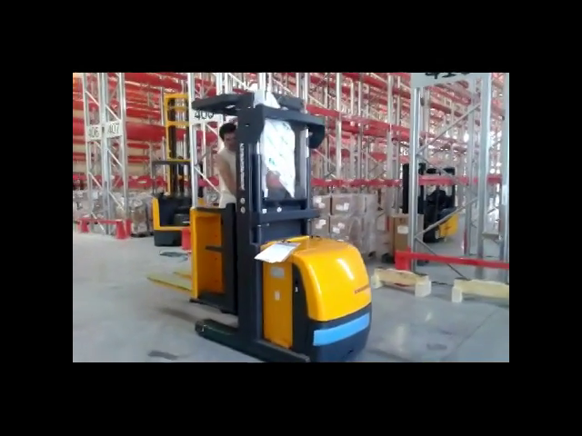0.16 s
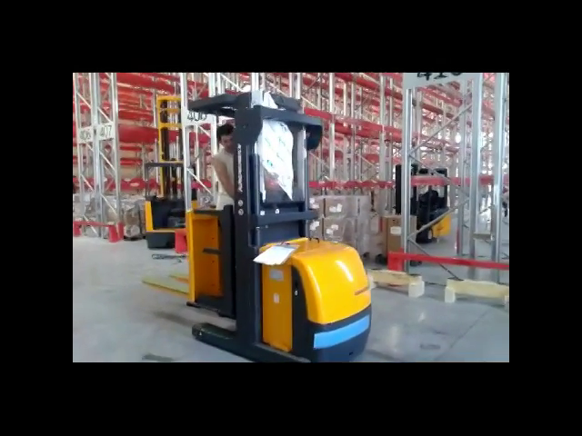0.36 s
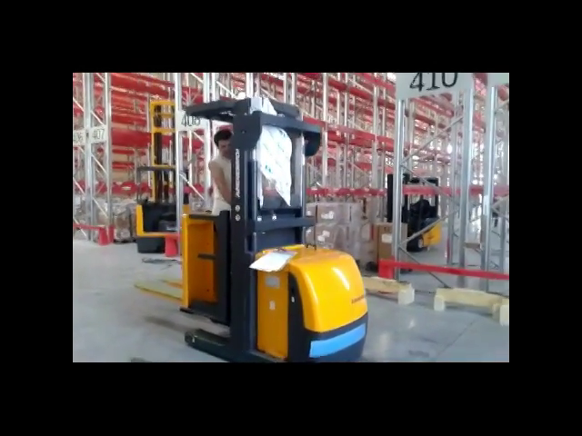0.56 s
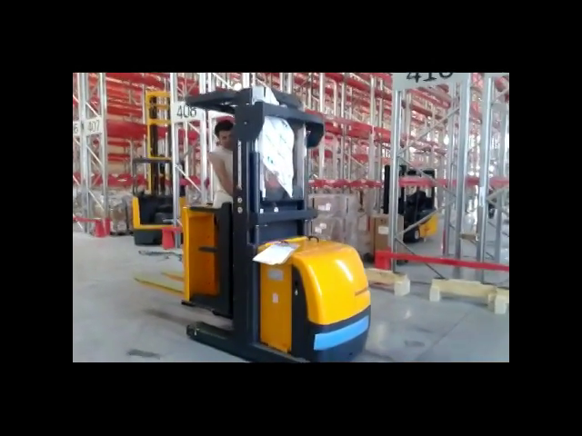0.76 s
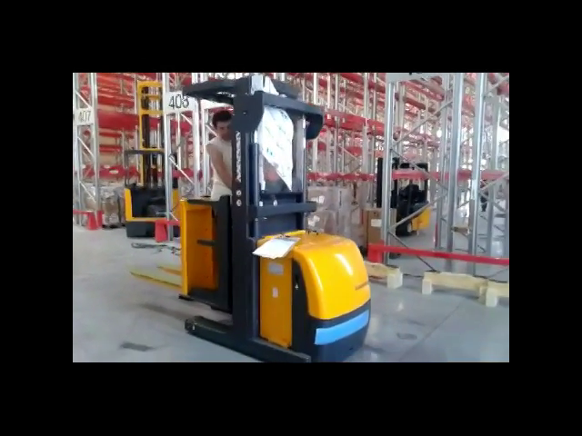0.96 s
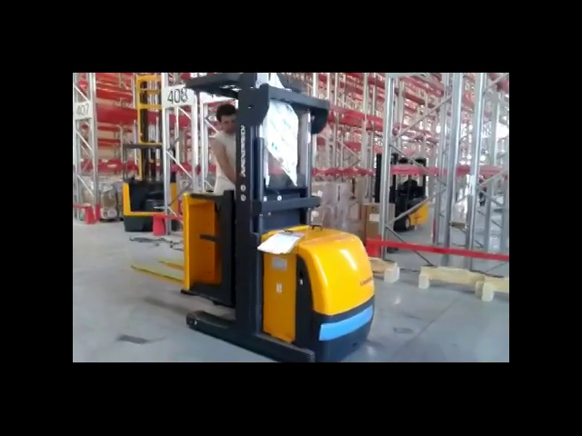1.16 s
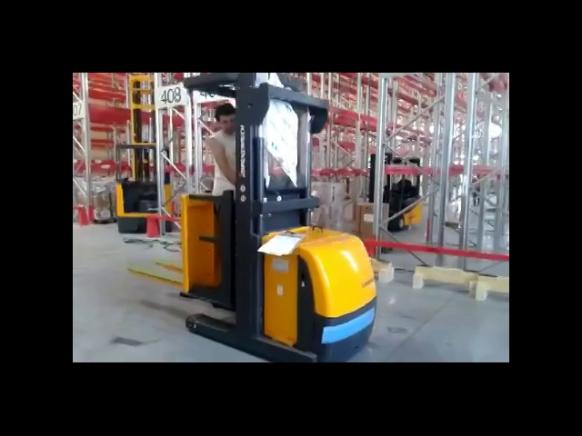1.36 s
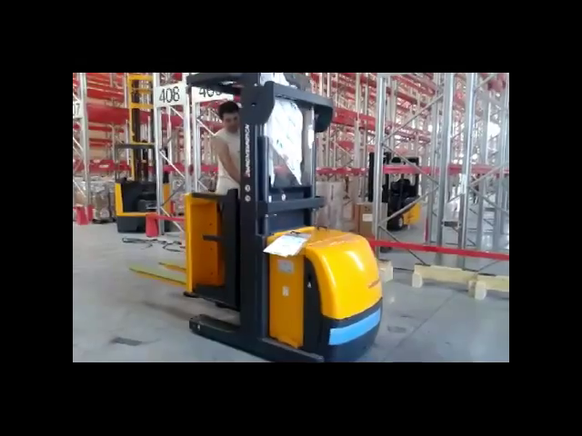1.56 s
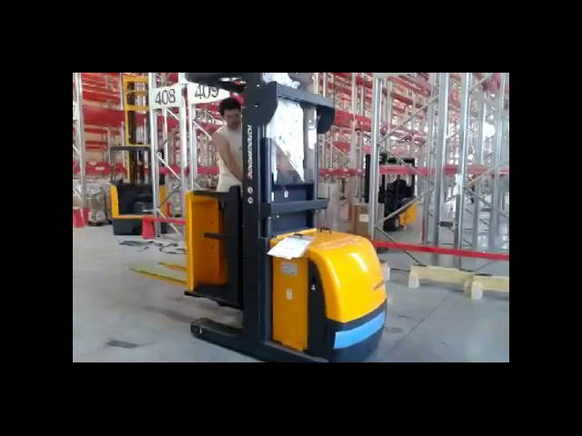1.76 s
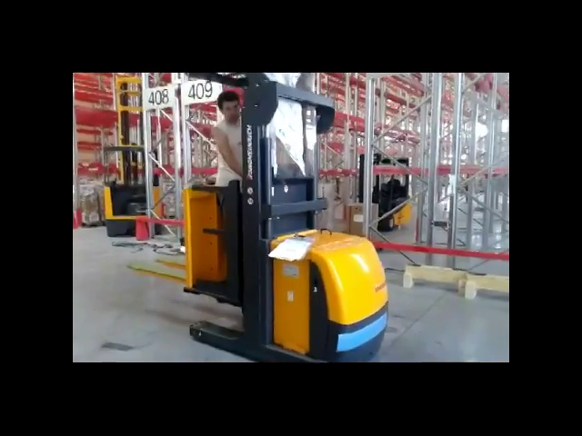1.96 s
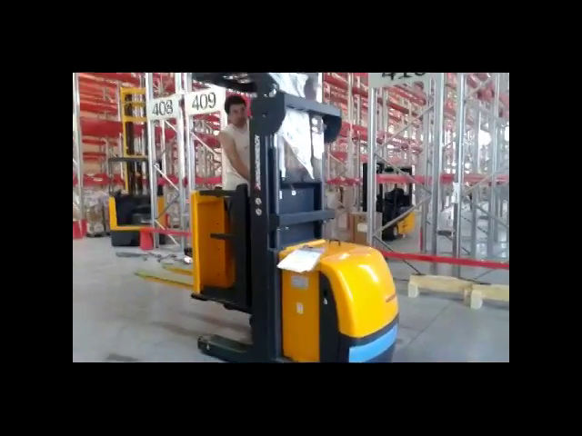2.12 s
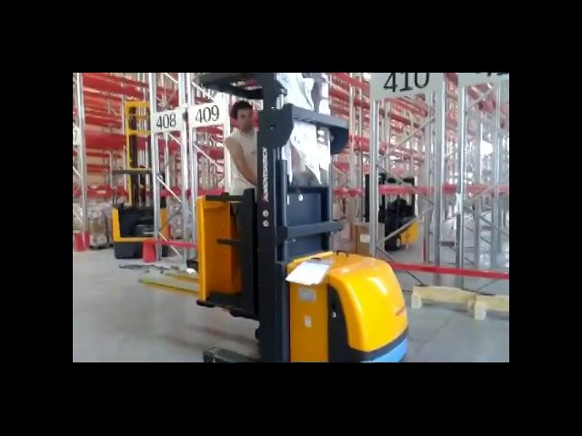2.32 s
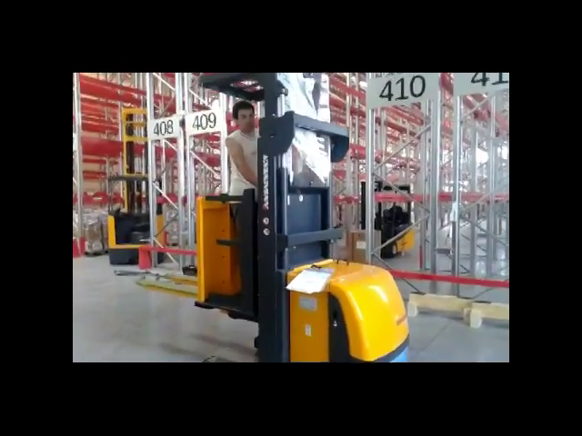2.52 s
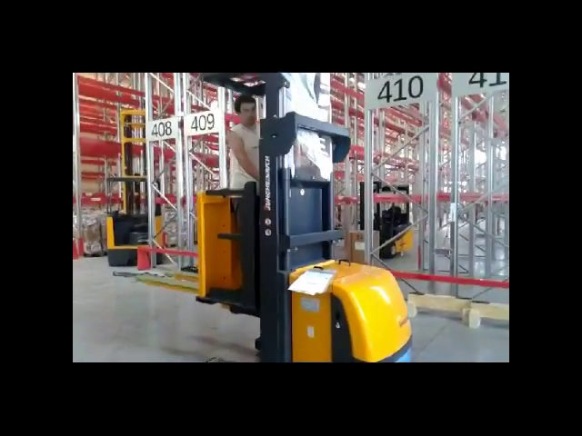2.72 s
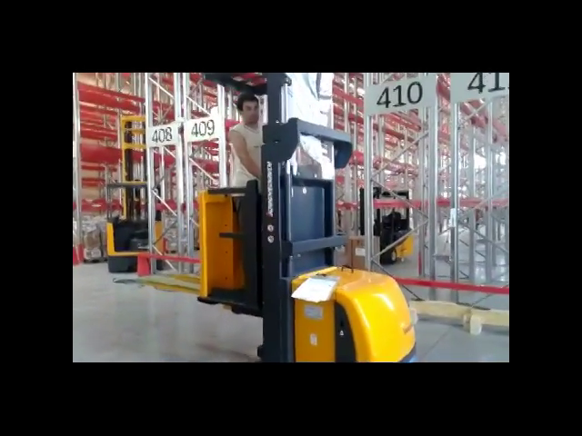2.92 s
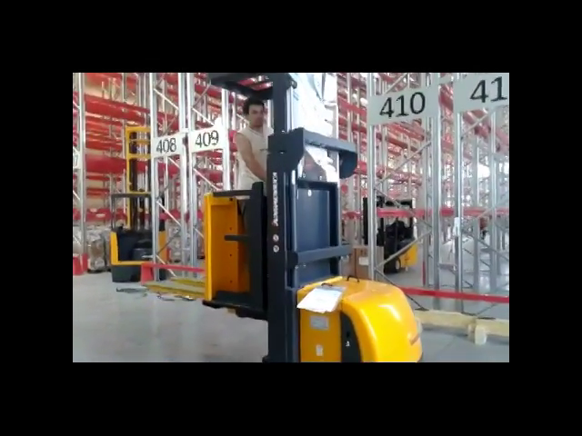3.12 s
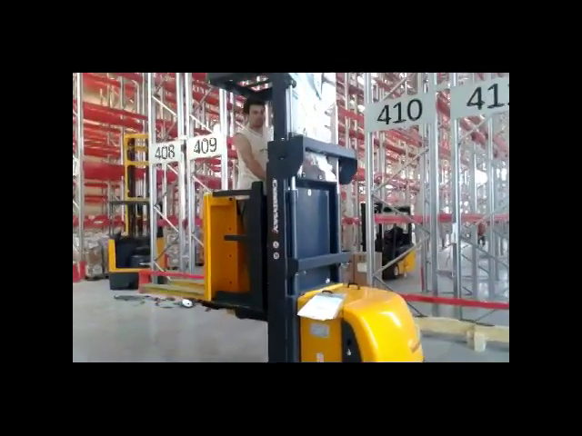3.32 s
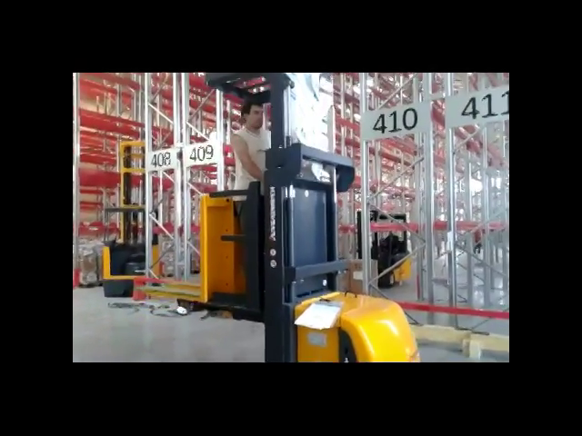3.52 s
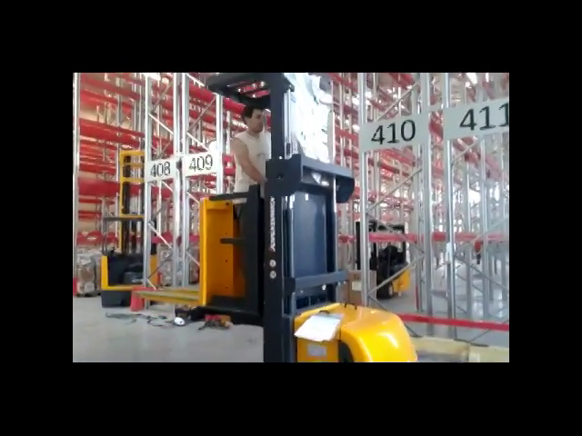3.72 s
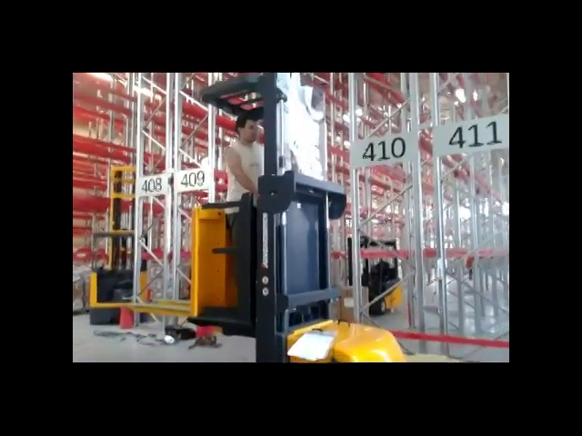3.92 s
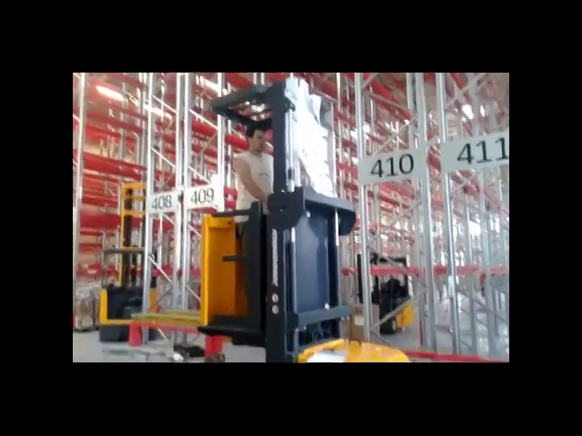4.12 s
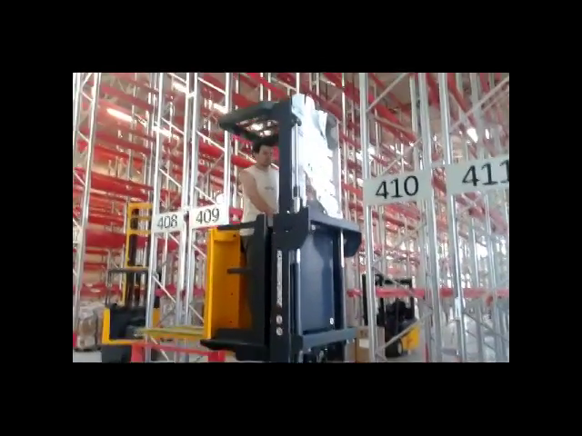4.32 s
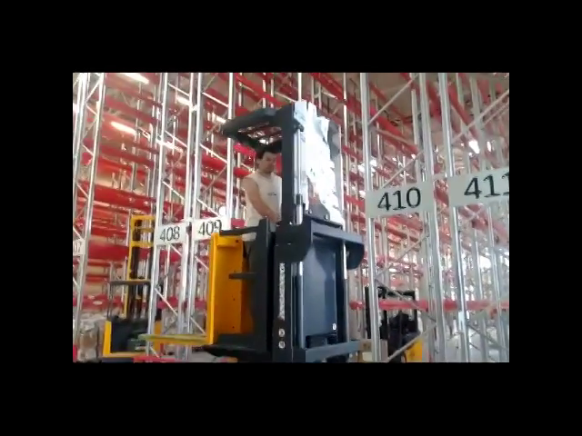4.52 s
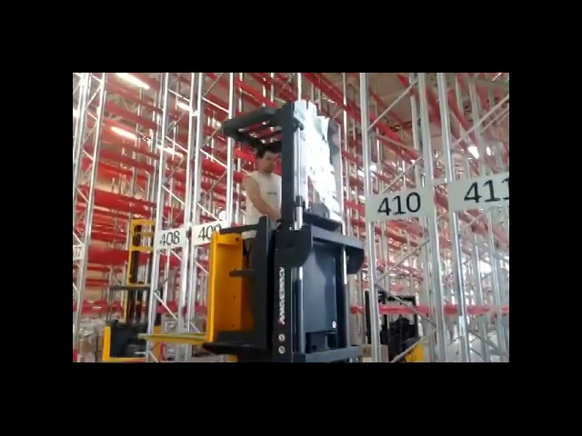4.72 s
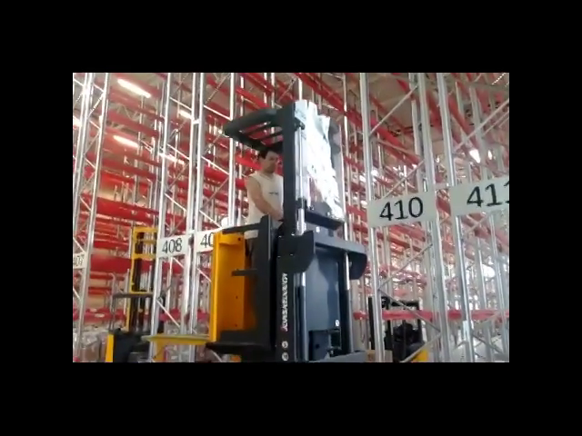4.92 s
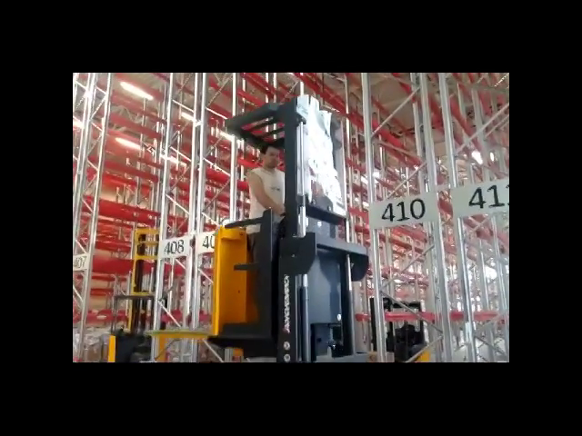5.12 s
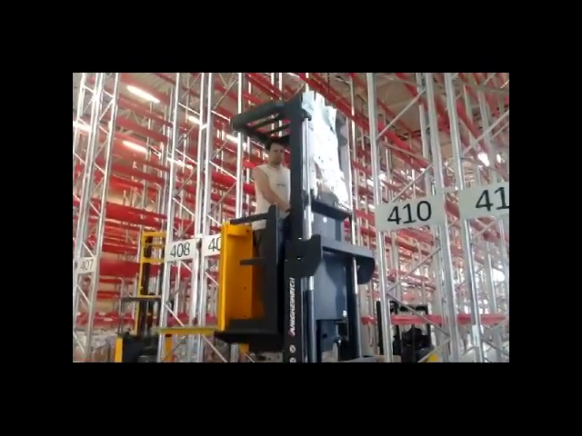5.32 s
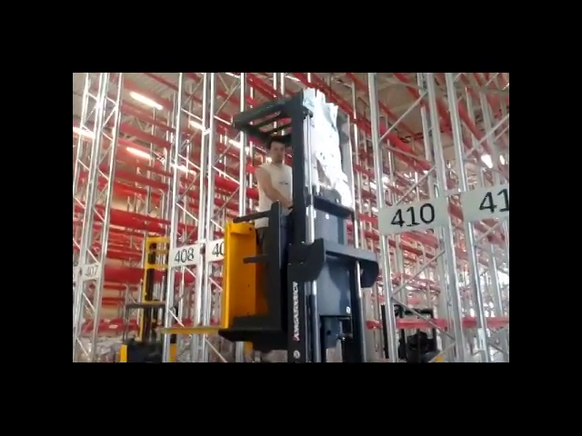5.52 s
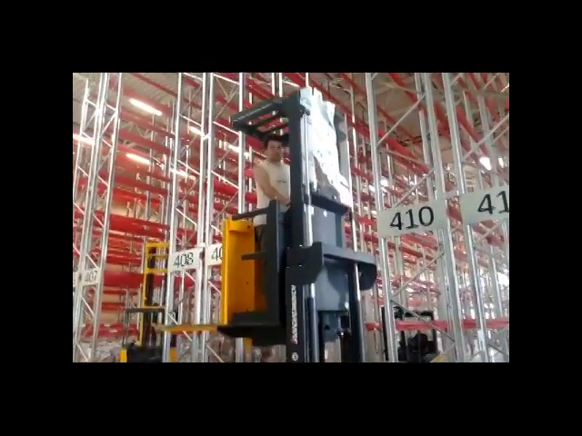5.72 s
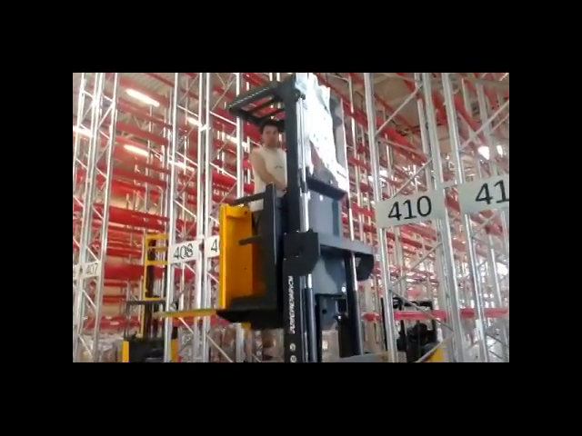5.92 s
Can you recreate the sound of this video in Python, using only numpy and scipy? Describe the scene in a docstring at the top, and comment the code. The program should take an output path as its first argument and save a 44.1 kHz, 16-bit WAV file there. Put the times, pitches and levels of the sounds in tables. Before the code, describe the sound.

A big hard-walled warehouse begins nearly quiet: a low, soft wash of distant work, faint electrical tones and a barely audible onset. From about 0.35 to 0.85 s something rustles close to the microphone in short bright strokes, while a far motor glides upward around 0.8 s. Dull, woody knocks land near 1.1 s, with a softer one at 1.24 s. At about 1.45 s the lift motor starts, groaning and sweeping upward, with a brief cover boom near 1.7 s, slightly overshooting about 2.05 s. It settles into a loud, steady hum, layered gear whine and bright oil hiss, throbbing around five times a second. Thin high whistles flutter from about 2.5 s, then fade. At 4.57 s a sharp, rattling steel clank rings through the hall. Around 5.8 s the hiss swells and the pitch sags, then partly recovers as two lighter clanks sound near 6 s, the motor still running.

```python
"""After a faint soft onset, a close rustle and dull knocks, an electric order picker raises its platform.
A distant motor glides upward in the warehouse; then the picker's motor spins up and drives its gear pump.
Twelve teeth give a hum and shaft multiples a whine, while turbulent oil rushes and hisses as filtered noise.
The load bounces on the oil column and rocks the speed; struck mast modes clank and the cover booms.
Near the end the motor sags, the hiss swells and the last clanks ring, over a steady wash of noise and faint tones."""
import sys
import numpy as np
from scipy import signal
from scipy.fft import rfft, irfft
from scipy.io import wavfile
from scipy.ndimage import uniform_filter1d

SR = 44100
rng = np.random.default_rng(int(sys.argv[2]) if len(sys.argv) > 2 else 0)


def transcribe(signal):
    """Save signal, clipped to [-1, 1], as a 16-bit WAV file at the path in sys.argv[1]."""
    frames = np.atleast_2d(signal).T
    limited = np.clip(frames, -1, 1)
    pcm = np.round(limited * 32767).astype(np.int16)
    wavfile.write(sys.argv[1], SR, pcm)


N = 267687
T = np.arange(N) / SR  # s
HZ = np.maximum(np.arange(N + 1) * SR / (2 * N), 1)  # frequency axis of the filters
TEETH = 12
FULL_SPEED = 37.8  # turns per s

# the pump takes up its load: moment of half level and time constant
WHINE_ON_S, WHINE_ATTACK_S = 1.526, 0.023
HISS_ON_S, HISS_ATTACK_S = 1.57, 0.026
WHINE_DB, HISS_DB = -32, -29.5  # drive levels that the whine and oil layers are scaled from
# extra effort while the platform gets moving
STRAIN_S, STRAIN_LENGTH_S, STRAIN_DB = 1.89, 0.12, 1.5
# the oil hisses harder in the last sag
SAG_S, SAG_LENGTH_S, SAG_HISS_DB = 5.8, 0.21, 2.5
# the gear overtones stand out while the motor accelerates
GRIND_S, GRIND_LENGTH_S, GRIND_DB = 1.44, 0.5, 3.5
BOUNCE_SWING_HZ = .65  # quickening of the shaft at the top of a bounce
JUDDER_TURNS = .0004  # spread of the shaft angle when well below full speed
# narrow resonances that whistle when a shaft multiple meets them
HIGH_WHISTLE_HZ, LOW_WHISTLE_HZ = 7259, 2035
# nominal speed of the pump shaft: spin-up, overshoot and two sags [time_s, speed_turns_per_s]
SHAFT_SPEED = [(1.4, 0), (1.55, 13), (1.62, 17.8), (1.7, 25.3), (1.79, 30.5), (1.88, 33), (1.96, 35.6),
               (2.05, 38), (2.13, 36.55), (2.27, 36.8), (2.33, 37.7), (2.38, 37.35), (2.5, 37.4),
               (2.65, 37.6), (5.62, 37.62), (5.77, 37.7), (5.855, 37.2), (5.9, 35.6), (5.945, 34.8),
               (6.04, 35.8), (6.07, 35.8)]
# level of each whistling resonance [time_s, level_db]
HIGH_WHISTLE_LEVEL = [(2.45, -50), (2.62, -32), (2.88, -33), (3.0, -33.5), (3.9, -38), (4.4, -47),
                      (5.7, -45), (5.85, -63)]
LOW_WHISTLE_LEVEL = [(4.55, -53), (4.949, -48), (5.4, -43), (5.7, -45), (5.8, -66)]


def lift():
    """Phase coupling: the integral of one shaft speed drives hum, whine and oil noise together."""
    speed = uniform_filter1d(curve(SHAFT_SPEED), SR // 25) + BOUNCE_SWING_HZ * surge()
    speed = speed * (1 + 0.0004 * walk(30))
    pace = speed / FULL_SPEED
    turns = np.cumsum(speed) / SR
    judder = JUDDER_TURNS * gliding_share(speed) * walk(70)

    strain_db = STRAIN_DB * swell(STRAIN_S, STRAIN_LENGTH_S)
    sag_db = SAG_HISS_DB * swell(SAG_S, SAG_LENGTH_S)
    grind_db = GRIND_DB * swell(GRIND_S, GRIND_LENGTH_S)
    whine = rise(WHINE_ON_S, WHINE_ATTACK_S) * undb(WHINE_DB + strain_db + 0.61 * walk(14))
    hiss = rise(HISS_ON_S, HISS_ATTACK_S) * undb(HISS_DB + strain_db + sag_db + 0.83 * walk(12))

    hum = pump_hum(turns, speed, running=np.minimum(whine / whine.mean(), 1)) * undb(-0.68)
    lines = pump_whine(turns + judder, speed, whine * undb(31.5 + grind_db), hiss * undb(30.5))
    whistles = hall(singing(turns), wet_db=1, t60=0.21)
    whistles = whistles + whistle(turns, HIGH_WHISTLE_HZ, HIGH_WHISTLE_LEVEL)
    whistles = whistles + whistle(turns, LOW_WHISTLE_HZ, LOW_WHISTLE_LEVEL)

    body = oil(turns, HOUSING_RESPONSE, pulsing=0.16, repeat_db=-14) * whine * undb(-7.0)
    # plain hiss gives way to the pitched squeal as the pump comes up to speed
    pitched = .35 * np.minimum(pace, 1) ** 3
    plain = oil(turns, HISS_RESPONSE, pulsing=0.15, repeat_db=-41)
    hissing = plain * np.sqrt(1 - pitched) + squeal(turns) * np.sqrt(pitched)
    hissing = hissing * hiss * undb(-4.5 - 1.28 * pace ** 4)
    flow = hall(body + hissing, wet_db=-7, t60=0.87)
    return hum + booms() + whistles + hall(lines, wet_db=-0.5, t60=0.68) + flow


THROB_LEAD_S = 0.061  # the sound throbs with the bounce, ahead of the speed
HUM_THROB_DB = 2.5  # times a share from -0.5 to 0.5 set by the speed
# share of the panels in the hum, at steady speed and added far below it
GROAN_STEADY_DB, GROAN_GLIDING_DB = -27, -8.5
# relative level of the tooth-rate hum [time_s, level_db]
HUM_LEVEL = [(1.45, -78), (1.49, -46), (1.64, -34), (1.68, -23), (1.76, -22.5), (1.85, -28.5), (1.9, -28),
             (1.94, -19.5), (2.02, -30), (2.12, -19), (2.17, -35), (2.21, -20.5), (2.27, -35.5),
             (2.34, -22.5), (2.42, -20), (2.98, -28.5), (3.04, -25.5), (3.41, -29), (3.44, -25),
             (4.36, -31.5), (4.47, -27.5), (5.12, -26.5), (5.935, -30.5), (5.957, -18.5), (5.985, -28),
             (6.07, -31.5)]
# panels that groan while the speed changes [pitch_hz, width_hz, level_db]
PANEL_MODES = [(242, 11, -12), (250, 25, 10), (295, 35, 12), (334, 9.3, 1), (357, 4.8, -15)]


def pump_hum(turns, speed, running, wet_db=-10, gliding_db=7):
    """Tooth-rate excitation: a gliding tone beats against its echoes and shakes resonant panels."""
    tone = np.sin(2 * np.pi * TEETH * turns + .07 * walk(40)) * running
    tone = shape(tone, 1 / (1 + (228 / HZ) ** 14))  # the small housing radiates little bass
    gliding = gliding_share(speed)
    echoes = hall(tone, wet_db=40, t60=1.2)
    panel_band = 1 / (1 + (220 / HZ) ** 14) / (1 + (HZ / 450) ** 6)
    groan = unit(shape(noise(), abs(resonances(PANEL_MODES)) * panel_band))
    slowness = np.clip((1 - speed / FULL_SPEED) * 5, 0, 1)
    shaken = undb(GROAN_STEADY_DB) + undb(GROAN_GLIDING_DB) * slowness ** 1.2
    field = tone + echoes * undb(wet_db + gliding_db * gliding) + groan * shaken
    level = fader(HUM_LEVEL) * undb(HUM_THROB_DB * bounce(THROB_LEAD_S) * (0.5 - gliding))
    running_power = uniform_filter1d(field ** 2, SR // 14)
    return field / np.sqrt(np.maximum(running_power, 1e-4)) * level


# overtones of gears and motor, relative levels [shaft_multiple, level_db]
GEAR_OVERTONES = [(16, -54), (22, -54.5), (24, -44.5), (26, -56), (34, -52), (35, -55), (36, -49),
                  (37, -55), (40, -55), (44, -53), (48, -42.5), (60, -46.5), (66, -58), (72, -48),
                  (78, -57), (84, -53), (90, -57), (96, -51), (105, -53), (108, -58), (120, -56),
                  (132, -53), (144, -55), (150, -59), (156, -54), (162, -55), (168, -49), (180, -50),
                  (186, -51), (192, -48), (197, -49), (204, -43.5), (216, -43.5), (228, -45), (240, -51),
                  (252, -55), (264, -52), (276, -57), (288, -61), (300, -63), (312, -63), (324, -67),
                  (336, -66)]
# multiples that swell or fade at the top of each bounce {shaft_multiple: change_db}
SURGING_OVERTONES = {24: -11, 180: -3, 216: 5, 228: -3}
# cover resonances that the overtones sweep through [pitch_hz, width_hz, boost_db]
COVER_MODES = [(770, 220, 19), (1340, 160, 0), (2300, 700, 5), (3900, 250, 1)]
# colour of the hiss, squeal and high lines, with a dip near 5.2 kHz [pitch_hz, level_db]
HISS_RESPONSE = [(3000, -17.5), (4200, -17.5), (4800, -6), (5200, -11), (5800, -3.5), (6700, 1),
                 (7500, 2.5), (8800, -2), (10500, -13), (13000, -17), (15500, -32)]


def cover_lift(hz):
    """Resonant gain: the cover lifts a tone that passes one of its modes."""
    return 1 + sum(undb(boost) / (1 + (2 * (hz - mode) / width) ** 2)
                   for mode, width, boost in COVER_MODES)


def hiss_gain(hz):
    """Spectral envelope: a high line takes the gain of the hiss colour at its own frequency."""
    hiss_hz, hiss_db = np.transpose(HISS_RESPONSE)
    return undb(np.interp(hz, hiss_hz, hiss_db))


def pump_whine(turns, speed, whine, hiss, split_hz=4400):
    """Harmonic synthesis: shaft multiples follow the cover below the split, the hiss colour above it."""
    out, pace, top = 0, speed / FULL_SPEED, surge()
    meshed = np.clip((pace - .5) * 5, 0, 1)
    for order, db in GEAR_OVERTONES:
        if order * FULL_SPEED < split_hz:
            gain, drive = cover_lift, whine * pace
        else:
            gain, drive = hiss_gain, hiss * pace ** 2
        if order in SURGING_OVERTONES:
            drive = drive * undb(SURGING_OVERTONES[order] * top)
        relative_gain = gain(order * speed) / gain(order * FULL_SPEED)
        out = out + undb(db) * drive * relative_gain * overtone(turns, order)
    return out * meshed


def overtone(turns, order):
    """Narrow-band modulation: one shaft multiple flutters in level and phase; rms near 1."""
    phase = 2 * np.pi * order * turns
    blur = .25 + .08 * order / 100
    line = np.sin(phase) * (1 + blur * walk(30)) + np.cos(phase) * blur * walk(30)
    return line * np.sqrt(2 / (1 + 2 * blur ** 2))


# colour of the pump housing [pitch_hz, level_db]
HOUSING_RESPONSE = [(40, -42), (55, -14), (75, -7.5), (125, -2), (180, -3), (280, -14), (420, 10.5),
                    (600, -2), (820, 0.5), (1100, -5.5), (1400, 0.5), (1900, 5.5), (2700, -5.5), (3800, -3),
                    (4200, -10.5), (4700, -20), (5200, -36), (7000, -22.5)]


def oil(turns, points, pulsing, repeat_db):
    """Modulated turbulence: each tooth pulses the noise, and a gear rasp repeats on every turn."""
    rush = noise() * (1 + pulsing * np.cos(2 * np.pi * TEETH * turns))
    one_turn = signal.resample(rng.standard_normal(640), 8192)
    angle = (turns % 1 * len(one_turn)).astype(int)
    rasp = one_turn[angle] * (1 + 0.55 * walk(30))
    return colour(rush + undb(repeat_db) * rasp, points)


def squeal(turns, width=170):
    """Periodic narrow-band noise: oil squeezed between teeth hisses at high tooth-rate multiples."""
    out = 0
    for k in range(11, 28):
        phase = 2 * np.pi * TEETH * k * turns
        band = np.sin(phase) * walk(width) + np.cos(phase) * walk(width)
        out = out + band * undb(3.8 * walk(11))
    return colour(out, HISS_RESPONSE)


SING_ATTACK_S, SING_RELEASE_S, SING_THROB_DB = 0.34, 0.065, 1.2
# dips as a swaying tone crosses a standing wave
STANDING_WAVE_DB, STANDING_WAVE_LEAD_S = 9, .009
# gear and motor tones that sing for a stretch; ramps lie outside it, and a stretch that ends
# before it starts peaks below the given relative level [start_s, end_s, level_db]
SINGING_STRETCHES = [(2.165, 2.278, -36.5), (2.53, 4.3, -37.5), (4.4, 5.84, -36.5), (3.6, 3.5, -47),
                     (5.7, 6.7, -50), (4.3, 5.72, -44.5), (3, 5.5, -55), (2.36, 2.27, -40.5),
                     (2, 6.05, -39), (2.2, 1.8, -46)]
# the multiple for each stretch [shaft_multiple]
SINGING_MULTIPLES = [36, 36, 36, 48, 48, 96, 96, 108, 192, 228]


def singing(turns):
    """Standing waves: sustained tones throb and cross a dead spot of the hall twice on each swing."""
    tones = sum(overtone(turns, round(order)) * undb(db) * hold(start, end, SING_ATTACK_S, SING_RELEASE_S)
                for order, (start, end, db) in zip(SINGING_MULTIPLES, SINGING_STRETCHES))
    sway = bounce(STANDING_WAVE_LEAD_S + .012 * walk(5))
    dead_spot = (1 - sway ** 2) ** 2 * hold(2.5, 5.75, .1, .1)
    throb_db = SING_THROB_DB * bounce(THROB_LEAD_S)
    return tones * undb(throb_db - STANDING_WAVE_DB * dead_spot + 1.05 * walk(16))


def whistle(turns, hz, levels, width_hz=7):
    """Forced resonance: a fixed narrow mode flutters as the nearest shaft multiple rocks across it."""
    gain = fader(levels)
    fed = overtone(turns, round(hz / FULL_SPEED)) * gain
    ring = shape(fed, resonances([(hz, width_hz, 0)]))
    return unit(ring) * np.sqrt(np.mean(gain ** 2))


BOOM_HZ = 294.3
# brief booms of the cover while the speed changes [centre_s, half_length_s, level_db]
COVER_BOOMS = [(1.584, 0.015, -33.5), (1.696, 0.012, -14.5), (2.127, 0.059, -37), (6.027, 0.026, -29.5)]


def booms():
    """Modal resonance: the lowest ring of the cover swells briefly."""
    ring = np.sqrt(2) * np.sin(2 * np.pi * BOOM_HZ * T + 0.38 * walk(40))
    return ring * sum(undb(db) * swell(s, half_length) for s, half_length, db in COVER_BOOMS)


def gliding_share(speed):
    """Speed deficit: 0 at full speed, 1 from a tenth below it."""
    return np.clip((1 - speed / FULL_SPEED) * 10, 0, 1)


BOUNCE_HZ, BOUNCE_S = 5.11, 4.116  # rate, and one moment of top speed


def bounce(lead=0):
    """Mass-spring oscillation: the platform swings on the oil column from -1 to 1."""
    return np.cos(2 * np.pi * BOUNCE_HZ * (T + lead - BOUNCE_S))


def surge():
    """Nonlinear oscillation: a brief quickening at the top of each bounce, from 0 to 1."""
    return ((1 + bounce()) / 2) ** 3 * hold(2.5, 5.75, .25, .1)


def blow(start, db, t60, response, chatter_db=-20, uneven_db=3):
    """Impulse excitation: a push and decaying chatter ring a body; level is energy over 10 ms."""
    struck = 1. * (T > start)
    decay = np.exp(-np.log(1000) * np.maximum(T - start, 0) / t60)
    chatter = unit(noise() * undb(uneven_db * walk(300))) * struck * decay
    push = np.diff(struck, prepend=0)
    ring = shape(push + undb(chatter_db) * chatter, response)
    return undb(db) * ring / np.sqrt(np.sum(ring ** 2) / (SR / 100))


# dull knocks, after a faint soft onset at the very start [start_s, level_db, chatter_t60_s]
DULL_ONSETS = [(0.02, -46, 0.094), (1.064, -37, 0.13), (1.076, -29.5, 0.086), (1.098, -35.5, 0.2),
               (1.236, -38.5, 0.21), (1.402, -49.5, 0.13)]
# body of the onset and knocks [pitch_hz, width_hz, level_db]
DULL_MODES = [(400, 150, -9), (540, 110, -6), (770, 70, 9), (899, 70, 13), (1250, 140, -2), (2120, 260, 0),
              (7200, 1100, -4)]
# clanks of the mast [start_s, level_db, chatter_t60_s, contact_pitch_hz]
MAST_CLANKS = [(1.468, -47, 0.055, 1210), (1.540, -38, 0.01, 2380), (4.563, -28, 0.038, 2800),
               (4.568, -25, 0.04, 2610), (4.572, -26, 0.08, 860), (4.573, -22, 0.23, 3400),
               (4.581, -28, 0.05, 1600), (4.592, -29, 0.089, 3550), (4.606, -29, 0.17, 2240),
               (5.977, -26, 0.043, 1820), (5.994, -27.5, 0.038, 1545)]
# steel of the mast [pitch_hz, width_hz, level_db]
MAST_MODES = [(940, 150, 16.5), (1320, 330, 9.5), (1835, 180, 10.5), (2040, 98, 1), (2700, 150, -1),
              (3170, 130, 3.5), (3540, 140, 3), (4470, 200, 2)]


def impacts(contact_width=0.34, soft_hz=1700, hard_hz=4800):
    """Modal excitation: soft onsets sound dull and woody; hard clanks favour modes near their pitch."""
    body = resonances(DULL_MODES) / (1 + 1j * HZ / soft_hz) ** 2 / (1 + 200 / (1j * HZ)) ** 2
    steel = resonances(MAST_MODES) / (1 + 1j * HZ / hard_hz - (HZ / hard_hz) ** 2) ** 2
    dull = sum(blow(s, db, t60, body, chatter_db=-16) for s, db, t60 in DULL_ONSETS)
    clanks = sum(blow(s, db, t60, steel * resonances([(hz, contact_width * hz, 0)]))
                 for s, db, t60, hz in MAST_CLANKS)
    return hall(dull, wet_db=-10.0, t60=0.57) + hall(clanks, wet_db=-11.0, t60=0.97)


# contact close by starts, holds and lets go
RUSTLE_START_S, RUSTLE_END_S = 0.388, 0.66
RUSTLE_ATTACK_S, RUSTLE_RELEASE_S = 0.082, 0.2
RUB_DB, SWISH_DB, BRUSH_DB = -53.5, -45, -43.5  # before the strokes are added
# colour of the rubbing [pitch_hz, level_db]
RUB_RESPONSE = [(150, -14), (400, -12), (1200, -11), (2000, -2.5), (3500, -1), (5000, -0.5), (7000, 4),
                (15000, -29)]
# strokes of the rubbing [centre_s, half_length_s, level_db]
RUB_STROKES = [(0.397, 0.024, -46), (0.515, 0.037, -37), (0.622, 0.057, -41.5), (0.737, 0.029, -42),
               (0.817, 0.025, -47)]


def rustle(grain_db=1.0, brush_s=0.063, swish_share=0.25):
    """Frictional noise: a dull brush at contact, strokes of dense tiny slips, and a bright swish."""
    contact = hold(RUSTLE_START_S, RUSTLE_END_S, RUSTLE_ATTACK_S, RUSTLE_RELEASE_S)
    press = sum(undb(db) * swell(s, half_length) for s, half_length, db in RUB_STROKES)
    grains = np.repeat(rng.standard_normal(N // 64 + 1), 64)[:N]
    slips = colour(noise() * undb(grain_db * grains), RUB_RESPONSE)
    swish = unit(shape(noise() * undb(1.0 * walk(121.0)), resonances([(7400, 1050, 0)])))
    brush = colour(noise(), HALL_RESPONSE) * swell(RUSTLE_START_S + brush_s / 2, brush_s)
    rubbing = slips * (undb(RUB_DB) + press)
    swishing = swish * (undb(SWISH_DB) + swish_share * press)
    return contact * (rubbing + swishing + brush * undb(BRUSH_DB))


HALL_DB = -51
# a motor speeds up far down the hall
FAR_S, FAR_LENGTH_S, FAR_DB = 0.78, 0.15, -50
FAR_HZ, FAR_GLIDE_HZ_PER_S = 406, 750
# colour of the hall's wash, also of the rustle's brush [pitch_hz, level_db]
HALL_RESPONSE = [(30, -40), (80, -9.5), (160, -11.5), (220, -2.5), (440, 1.5), (600, -2.5), (850, -2),
                 (1400, -9.5), (2100, -6.5), (3000, -17.5), (5000, -19), (7300, -16), (10000, -27.5),
                 (15000, -31)]
# faint electrical tones of the idle truck, relative levels [pitch_hz, level_db]
IDLE_TONES = [(2024, -64), (3585, -76), (4285, -92)]


def warehouse(idle_db=-1):
    """Ambient superposition: a wash of distant work, a far gliding motor and faint truck tones."""
    uneven = undb(0.61 * walk(25.0) + 0.09 * walk(8.2))
    wash = colour(noise() * uneven, HALL_RESPONSE) * undb(HALL_DB)
    far_hz = (FAR_HZ + FAR_GLIDE_HZ_PER_S * (T - FAR_S)) * (1 + 0.042 * walk(69.8))
    far_tone = np.sin(2 * np.pi * np.cumsum(far_hz) / SR) * swell(FAR_S, FAR_LENGTH_S)
    far = hall(far_tone, wet_db=2, t60=0.55) * undb(FAR_DB)
    tones = sum(undb(db) * np.sqrt(2) * np.sin(2 * np.pi * hz * T + 0.82 * walk(6.9))
                for hz, db in IDLE_TONES)
    return wash + far + tones * undb(idle_db)


def hall(x, wet_db, t60):
    """Diffuse reverberation: racks and concrete scatter echoes whose treble dies first."""
    tail = noise()
    low = shape(tail, 1 / (1 + 1j * HZ / 3000))
    echo = low * undb(-60 * T / t60) + (tail - low) * undb(-120 * T / t60)
    echo *= T > .008  # the first echo comes after 8 ms
    echo /= np.sqrt(np.sum(echo ** 2))
    wet = undb(wet_db)
    return (x + wet * signal.fftconvolve(x, echo)[:N]) / np.sqrt(1 + wet ** 2)


def resonances(modes):
    """Modal superposition: the summed response of (Hz, width Hz, dB) modes."""
    return sum(undb(db) / (1 + 1j * (HZ ** 2 - hz ** 2) / (HZ * width)) for hz, width, db in modes)


def shape(x, gain):
    """Linear filtering: multiply the spectrum by a frequency response."""
    return irfft(rfft(x, 2 * N) * gain)[:N]


def colour(x, points):
    """Spectral colouration: filter by (Hz, dB) points; rms 1."""
    hz, db = np.transpose(points)
    return unit(shape(x, undb(np.interp(np.log(HZ), np.log(hz), db))))


def noise():
    """White noise: independent Gaussian samples."""
    return rng.standard_normal(N)


def walk(rate):
    """Band-limited fluctuation: a smooth wander through rate random points per second, spread near 1."""
    return np.interp(T * rate, np.arange(8192) / 4, signal.resample(rng.standard_normal(2048), 8192))


def undb(db):
    """Logarithmic level: decibels to amplitude gain."""
    return 10 ** (np.asarray(db) / 20)


def unit(x):
    """Power normalization: scale to an rms of 1."""
    return x / np.sqrt(np.mean(x ** 2))


def curve(rows):
    """Linear interpolation: join (s, value) rows by straight lines."""
    rows = np.array(rows)
    return np.interp(T, rows[:, 0], rows[:, 1])


def fader(rows):
    """Level envelope: gain from an (s, dB) curve, silent before its start."""
    return undb(curve(rows)) * (T > rows[0][0])


def swell(centre, half_length):
    """Gaussian envelope: a rise and fall with a top of 1."""
    return np.exp(-((T - centre) / half_length) ** 2)


def rise(middle, time_constant):
    """Logistic envelope: an S-shaped climb from 0 to 1."""
    return .5 + .5 * np.tanh((T - middle) / (2 * time_constant))


def hold(start, end, attack, release):
    """Trapezoidal envelope: full from start to end, with a straight ramp on either side."""
    return np.clip(1 + np.minimum((T - start) / attack, (end - T) / release), 0, 1)


def scene():
    """Superposition: all sources add at one microphone."""
    return (lift() + impacts() + rustle() + warehouse())[None]


def record(dry):
    """Low-pass filtering: a steep elliptic filter cuts the top above 15750 Hz."""
    return signal.sosfilt(signal.ellip(10, .2, 80, 15750, fs=SR, output="sos"), dry)


dry = scene()
out = record(dry)
transcribe(out)
```